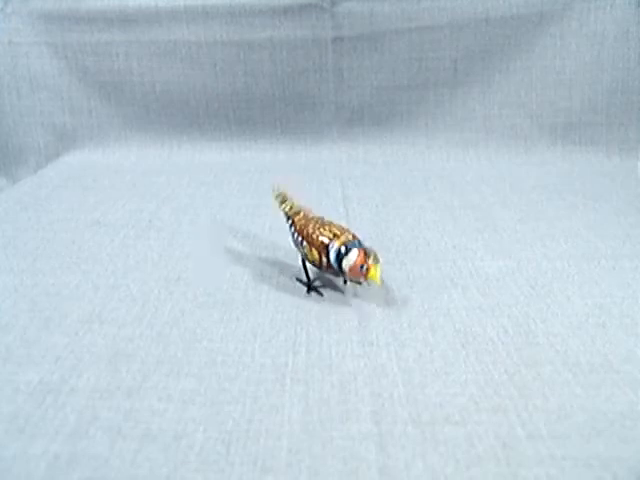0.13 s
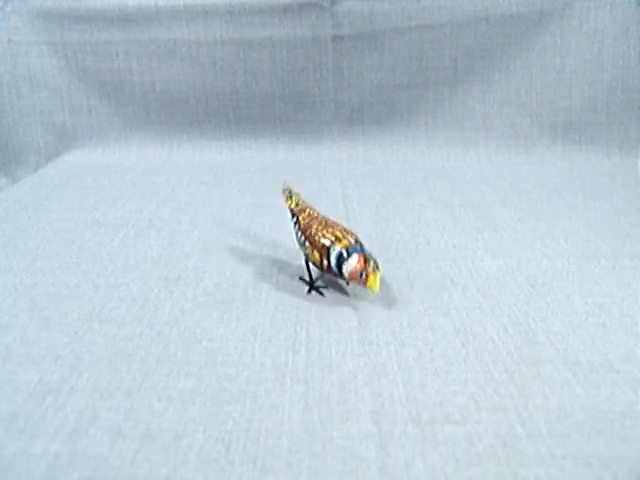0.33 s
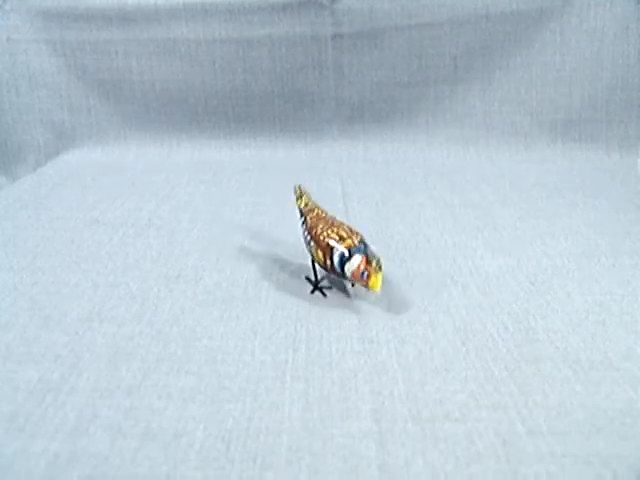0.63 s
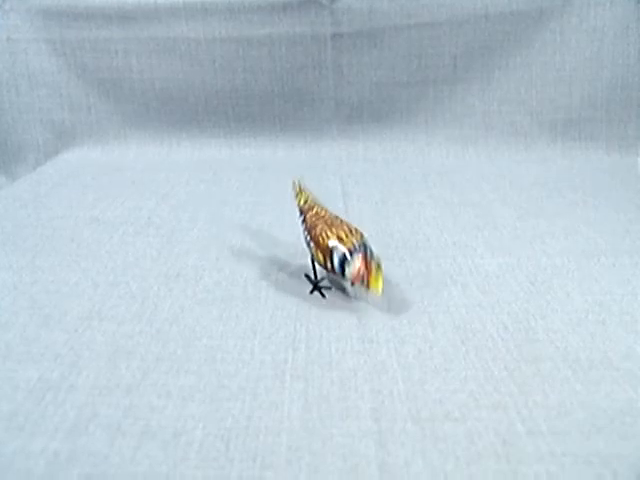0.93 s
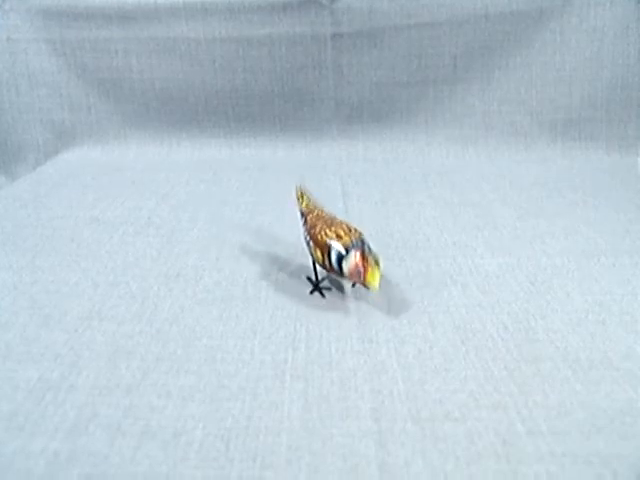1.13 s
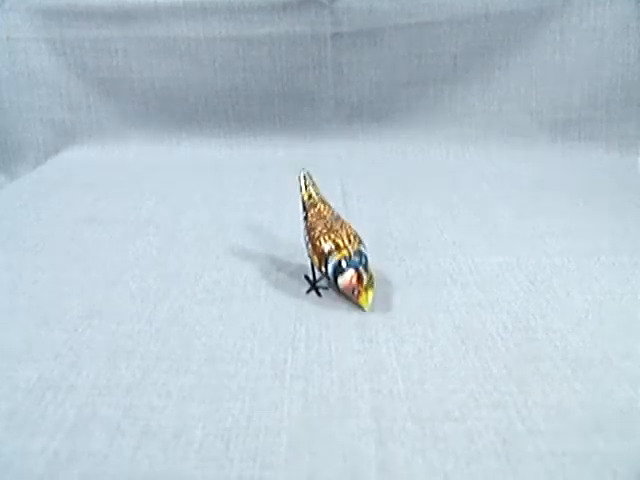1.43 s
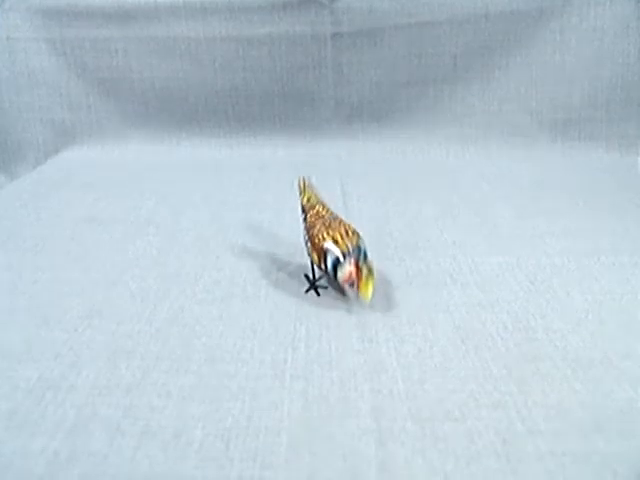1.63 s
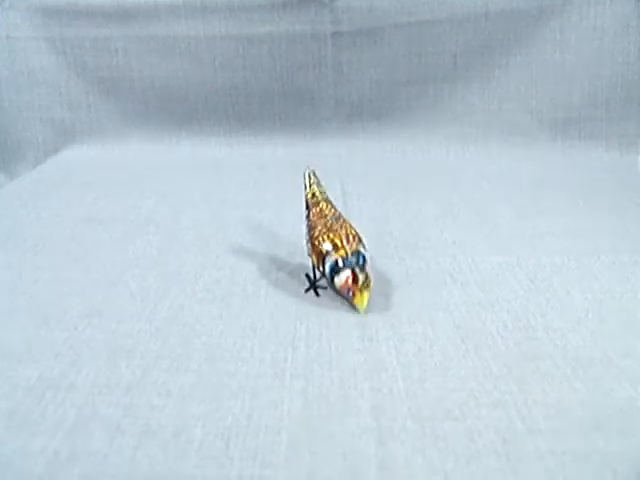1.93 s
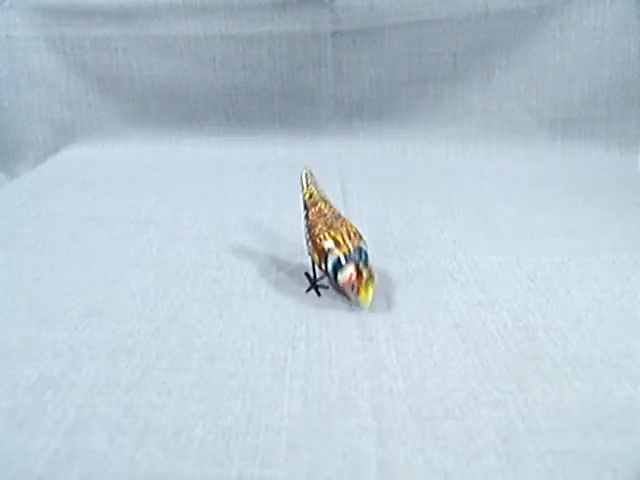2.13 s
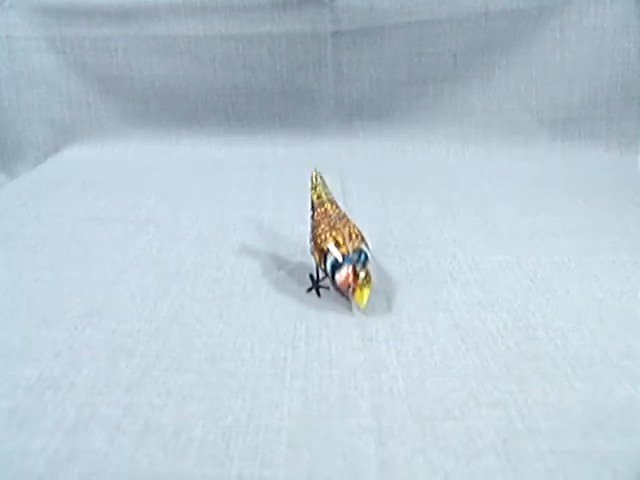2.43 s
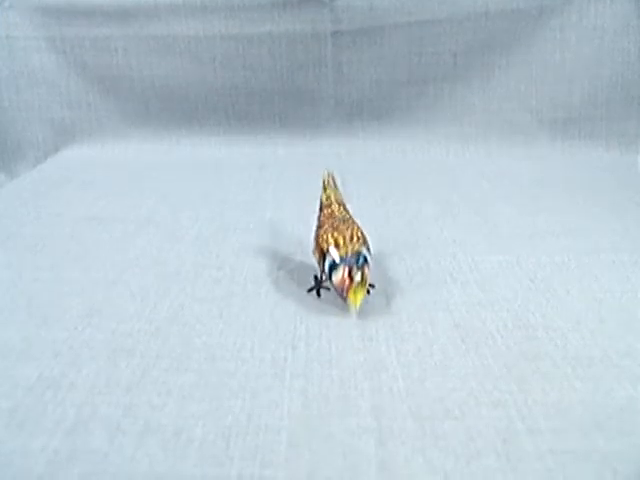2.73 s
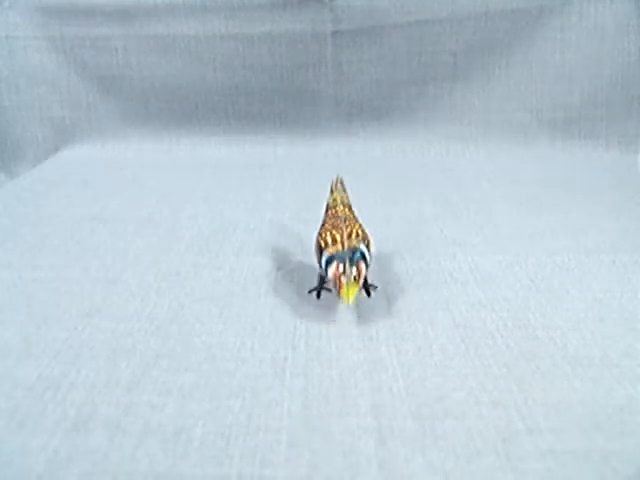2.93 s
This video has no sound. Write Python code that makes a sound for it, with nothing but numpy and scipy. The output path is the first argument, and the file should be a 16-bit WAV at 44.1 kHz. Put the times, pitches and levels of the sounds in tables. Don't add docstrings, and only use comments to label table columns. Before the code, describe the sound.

A clockwork tin bird rocks on a cloth-covered board, soft beak pecks alternating with sharper ringing metallic clacks, small rattles and dull foot thumps between, over faint gear whir; small room, close microphone.

```python
import sys
import numpy as np
from scipy import signal
from scipy.fft import rfft, irfft
from scipy.io import wavfile
from scipy.ndimage import uniform_filter1d, minimum_filter1d

SR = 44100
rng = np.random.default_rng(int(sys.argv[2]) if len(sys.argv) > 2 else 0)


def invert_db(x):
    u = np.asarray(x, float) / 20
    return 10 ** u


def to_wav(sig):
    pcm = np.clip(np.atleast_2d(sig), -1, 1) * 32767
    pcm = np.round(pcm).astype(np.int16)
    wavfile.write(sys.argv[1], SR, pcm.T)


N = 136710
T = np.arange(round(0.25 * SR)) / SR
BRIEF = T[:2000]


def read(points, hz):
    f, value = np.transpose(points)
    return np.interp(np.log(hz + 1), np.log(f + 1), value)


def evened(x):
    return x / np.sqrt(np.mean(x ** 2) + 1e-20)


def add(mix, s, sound):
    part = mix[round(s * SR):][:len(sound)]
    part += sound[:len(part)]


def coloured(points, size):
    z = rfft(rng.standard_normal(size))
    return evened(irfft(z * invert_db(read(points, np.fft.rfftfreq(size, 1 / SR))), size))


def modes(table, extra_db=0, t=T):
    hz, db, t60 = np.transpose(table)[:, :, None]
    level_luck, tuning_luck = rng.standard_normal((2, len(table), 1))
    wave = np.sin(2 * np.pi * hz * (1 + 0.0015 * tuning_luck) * t)
    drift = rng.standard_normal(wave.shape)
    for _ in range(2):
        drift = uniform_filter1d(drift, size=150)
    waver = 1 + 0.25 * evened(drift)
    decay = invert_db(db + extra_db + 1.2 * level_luck - 60 * t / t60)
    return (decay * wave * waver).sum(0)


SHELL_HZ = [1461, 2505, 2592, 3200, 3410, 3605, 3700, 4160, 4550, 5300, 6360, 7575, 7780, 8715]
# level_db, t60_s
SHELL = [(-29.5, 0.3), (-35.5, 0.064), (-11, 0.076), (-5.5, 0.079), (-22, 0.28), (-0.5, 0.055),
         (-26, 0.018), (-25.5, 0.33), (-20, 0.21), (-34, 0.36), (-23.5, 0.22), (-19, 0.11), (-15, 0.033),
         (-17.5, 0.078)]


def shell(low_db=0, t=T):
    table = np.column_stack([SHELL_HZ, SHELL])
    return modes(table, low_db * (table[:, :1] < 2800), t)


# freq_hz, level_db, t60_s
BOARD = [(129.1, -15, 0.39), (210, -34, 0.31), (278, -16.5, 0.19), (315.4, -7.5, 0.043), (463, -0.5, 0.032),
         (701, -17.5, 0.023), (914, -18.5, .02), (1119, -6.5, 0.036), (1530.5, -3, 0.044)]


def board():
    return modes(BOARD)


def crack(colour, decay_s=0.0077, rise_s=0.0003):
    shape = np.exp(-T / decay_s) * np.minimum(T / rise_s, 1) ** 2
    out = coloured(colour, len(T)) * shape
    return out * np.linalg.norm(shape) / np.linalg.norm(out)


def blows(rattle_db, delay=0.0):
    size, draw = rng.standard_normal(len(T)), rng.random(len(T))
    hits = draw < 900 / SR
    train = size * hits * np.exp(-T / 0.028) * (T > delay + 0.002)
    return invert_db(rattle_db - 6) * train / (np.linalg.norm(train) + 1e-9)


def struck(train, body):
    return signal.fftconvolve(train, body)[:len(T)]


# freq_hz, level_db
WHIR = [(24, -9.5), (55, 18.5), (320, 11.5), (926, -7), (3540, -1.5), (5000, 2.5), (7580, 0.5), (8310, 1),
        (10000, -2), (13000, -31), (22000, -120)]


def whir():
    flutter = evened(uniform_filter1d(rng.standard_normal(N), size=300))
    teeth = rng.standard_normal(N) * (rng.random(N) < 900 / SR)
    ring = evened(signal.fftconvolve(teeth, shell())[:N])
    return invert_db(-50.5) * invert_db(4 * flutter) * (coloured(WHIR, N) + invert_db(-20) * ring)


# freq_hz, level_db
PECK_CRACK = [(350, -19), (600, 1), (2580, 5.5), (3550, 0.5), (4990, 1), (5680, 5), (8580, 4.5),
              (10000, 2.5), (13000, -26), (22000, -120)]
# start_s, level_db, board_db, ring_db, rattle_db
PECKS = [(0.0797, -10.5, -23.5, -1, -19), (0.2376, -9.5, -24, -6.5, -13), (0.4324, -9, -22.5, -9.5, -11.5),
         (0.5731, -10.5, -21.5, -0.5, -13), (0.73, -10, -24.5, -3, -21), (0.9345, -11, -23.5, -3, -11),
         (1.1071, -9.5, -22, -3, -14.5), (1.285, -10, -22.5, -4, -12.5), (1.4886, -12.5, -37, -4.5, -7.5),
         (1.6586, -11, -24.5, 0, -32), (1.8101, -11.5, -26, -2, -18), (1.9705, -13.5, -26.5, 1, -23),
         (2.157, -12.5, -25.5, 0, -20), (2.3289, -10.5, -22, -8.5, -14.5),
         (2.4885, -11.5, -24.5, -4.5, -18), (2.638, -14, -26.5, -8.5, -8.5), (2.802, -13, -26.5, -3, -18),
         (2.9274, -11.5, -26, -2, -32), (3.0591, -15, -27.5, -4, -9.5)]


def peck(s, db, board_db, ring_db, rattle_db):
    jar = np.minimum(T / 0.0029, 1) ** 2
    tin = invert_db(ring_db - 7.5) * shell() * jar + invert_db(-7.5) * crack(PECK_CRACK, 0.0042, 0.0016)
    rattle = struck(blows(rattle_db + 16.5), tin * np.exp(-T / 0.0045))
    knock = invert_db(board_db - 1) * board() * np.minimum(T / 0.0011, 1)
    return s + 0.0004, invert_db(db) * (tin + rattle) + knock


# freq_hz, level_db
CLACK_CRACK = [(200, -21.5), (600, -10), (1100, -13.5), (1600, 5.5), (3200, -9.5), (4950, -4), (6200, 2),
               (10000, -2.5)]
# start_s, level_db, treble_db
REBOUNDS = [(0.1037, -31.5, -6.5), (0.1148, -47, -9), (0.1298, -41, -4), (0.1799, -26, -2),
            (0.1882, -23, -8.5), (0.2577, -26.5, -17), (0.2937, -50, -7), (0.3856, -37, -18),
            (0.392, -24, -21.5), (0.5148, -21.5, -7), (0.5471, -26, -46), (0.6662, -24, -11),
            (0.6847, -37, 3), (0.6907, -48, -23), (0.7005, -36, -10), (0.823, -38, -4.5),
            (0.8603, -14.5, -20.5), (0.882, -26, -15), (0.9129, -33, -55), (0.9636, -36, -8),
            (1.0286, -43, -11), (1.0394, -26.5, -9.5), (1.1301, -40, -4), (1.2199, -31, -28),
            (1.2352, -28, -14), (1.3613, -38, -12), (1.4305, -32, -14.5), (1.5046, -25, -8.5),
            (1.5681, -18, -25), (1.662, -20, -18), (1.6676, -17.5, -16), (1.7061, -49, -14),
            (1.7345, -20.5, -10.5), (1.8332, -25, -9.5), (1.8947, -12.5, -25.5), (1.9017, -25, -11),
            (1.9134, -35, -34), (2.0796, -11.5, -20.5), (2.0939, -31, -23), (2.1747, -21.5, -15),
            (2.1877, -41, -10), (2.1944, -33, -23), (2.251, -17, -14), (2.2593, -24.5, -19),
            (2.2684, -30, -31), (2.4397, -28, -11), (2.4464, -34, -10), (2.4591, -27, -33),
            (2.5872, -11.5, -37), (2.6016, -27, -11.5), (2.7829, -36, -38), (2.8173, -25, -16),
            (2.8286, -33.5, -3.5), (2.895, -18.5, -12.5), (2.9057, -29, -17), (2.9104, -40, -19),
            (2.9451, -32, -10), (3.0193, -15, -15)]


def rebound(s, db, treble_db):
    ring = shell(t=BRIEF) * np.exp(-BRIEF / 0.0067) * np.minimum(BRIEF / 0.0016, 1)
    tick = crack(CLACK_CRACK, 0.0032, 0.00024)[:len(BRIEF)]
    return s, invert_db(db - 6.5) * (ring + invert_db(treble_db + 18) * tick)


# freq_hz, level_db
THUD = [(60, -18.5), (150, -2), (600, -4), (1200, -29.5), (3000, -54.5)]
# start_s, level_db, pitch_hz, hollow_db
LANDINGS = [(0.187, -10, 230, -4.5), (0.346, -17.5, 285, -1), (0.521, -12, 314, -8),
            (0.948, -6.5, 260, -14), (1.386, -6.5, 508, -14.5), (1.496, 0, 343, -14.5),
            (1.663, -4, 326, -5.5), (1.822, -8, 260, -2.5), (1.989, -16.5, 231, -11.5),
            (2.177, -8, 317, -5.5), (2.738, -18.5, 316, -3), (3.016, -41, 473, 10)]
# start_s, level_db, pitch_hz, hollow_db
TICK = (.129, -15, 950, -35)


def landing(s, db, hz, hollow_db):
    patch = [(hz, 0, 0.035), (1.577 * hz, -1, 0.03), (130.5, hollow_db, 0.23)]
    thud = invert_db(-11.5) * (hz < 700) * crack(THUD, 0.0094, 0.0031)
    return s, invert_db(db - 18) * (modes(patch) + thud) * np.minimum(T / 0.0043, 1)


# start_s, level_db, low_ring_db, rattle_db, free_ringing_s
CLACKS = [(.168, -9.5, 2, -6, .03), (.3293, -4, 6, 8, 0.032), (.5039, -7.5, 5.5, 7, 0.044),
          (.6533, -4, 2.5, -5, 0.028), (.849, -7, 3, -9, 0.031), (1.0165, -6, -1, -7, 0.012),
          (1.1993, -7, 9, 4, 0.029), (1.3878, -8, 2.5, -7, 0.013), (1.558, -6.5, -.5, -6, 0.011),
          (1.7216, -7, -8, -0.5, 0.022), (1.8827, -7.5, -2.5, 0, 0.02), (2.0683, -9.5, 1, -1, 0.031),
          (2.2376, -6.5, -1, -8, 0.035), (2.4142, -7.5, 7, 3, 0.032), (2.5755, -7, 3.5, -10, 0.016),
          (2.721, -7, 3.5, -14, 0.037), (2.8784, -6, 4, -6, 0.019), (3.0046, -8, -7, -5, 0.056)]


def clack(s, db, low_db, rattle_db, free_s):
    ring_db, second_s = -7.5, 0.0042
    held = np.exp(-T / 0.0045)
    train = blows(min(rattle_db + 3.5, 5), second_s)
    rest = invert_db(-10 / (1 + np.exp(np.clip((free_s - T) / 0.00017, -50, 50))))
    onset = np.minimum(T / 0.00062, 1) * (1 + 0.47 * np.exp(-T / 0.0014))
    blow = invert_db(ring_db) * shell(low_db) * onset + invert_db(-15) * crack(CLACK_CRACK)
    touch = invert_db(ring_db - 21) * shell() * held + invert_db(-8) * crack(CLACK_CRACK, 0.0039, 0.0018)
    rattle = struck(train, blow * held)
    push = invert_db(-33.5) * np.sin(2 * np.pi * 64 * T) * np.exp(-T / 0.024)
    delayed = np.pad(blow, (round(second_s * SR), 0))[:len(T)]
    tin = touch + (delayed + rattle) * rest
    return s - second_s - 0.001, invert_db(db) * (tin + invert_db(-28.5) * board() + push)


# freq_hz, t60_s
ROOM = [(200, 0.13), (1000, 0.39), (4000, 0.17), (10000, 0.13)]


def room(x):
    size = SR // 3
    taps = rng.standard_normal(size) * (np.arange(size) > 90)
    hz, t, z = signal.stft(taps, SR, nperseg=256)
    decay = invert_db(-60 * t / read(ROOM, hz)[:, None])
    tail = rfft(signal.istft(z * decay, SR, nperseg=256)[1])
    tail = irfft(tail / np.sqrt(abs(tail) + 1e-9))
    tail = tail[:SR // 4] * np.hanning(SR // 2)[SR // 4:]
    return signal.fftconvolve(x, tail / np.linalg.norm(tail))[:N]


def scene():
    toy = np.zeros((3, N))
    feet = list(LANDINGS) + [TICK]
    for table, source in ((PECKS, peck), (REBOUNDS, rebound), (feet, landing), (CLACKS, clack)):
        for k, row in enumerate(table):
            add(toy[k % 3], *source(*row))
    wet = sum(part + invert_db(-11.5) * room(part) for part in toy)
    opening = np.clip((np.arange(N) / SR - 0.0744) / 0.0022, 0, 1)
    return ((wet + whir()) * opening)[None]


# start_s, length_s, lowest_lost_hz
DROPOUTS = [(0.218, 0.0058, 4900), (0.288, 0.036, 2080), (0.396, 0.029, 3800), (0.467, 0.03, 2170),
            (0.549, 0.019, 4820), (0.611, 0.039, 2000), (0.905, 0.026, 3180), (0.969, 0.043, 2870),
            (1.085, 0.022, 3220), (1.156, 0.021, 4200), (1.27, 0.017, 3900), (1.515, 0.035, 4500),
            (1.621, 0.037, 1140), (1.692, 0.024, 5100), (1.825, 0.049, 4160), (1.954, 0.015, 3650),
            (2.133, 0.02, 1890), (2.202, 0.032, 1660), (2.307, 0.019, 4400), (2.376, 0.029, 1820),
            (2.455, 0.027, 3850), (2.774, 0.028, 3670), (2.831, 0.042, 3640), (3.031, 0.023, 4340)]


def starved(x):
    frame = dict(fs=SR, window=np.sin(np.pi * (np.arange(512) + 0.5) / 512), nperseg=512, noverlap=256)
    lead = 51
    hz, t, z = signal.stft(np.pad(x, (lead, 0)), **frame)
    t, hz = t - lead / SR, hz[:, None]

    power = uniform_filter1d(abs(z) ** 2, size=9, axis=0)[4::8]
    band_db = 10 * np.log10(abs(power) + 1e-20).repeat(8, 0)
    band_db = np.vstack([band_db, band_db[-1:]])
    loud_db = -minimum_filter1d(-band_db.max(0), size=7)
    limit_db = loud_db - 31 + 11 * np.log2(hz / 4000 + 0.11)

    fine = rng.standard_normal((33, len(t)))
    coarse = rng.standard_normal((17, len(t) // 2 + 1)).repeat(2, 0).repeat(2, 1)
    luck = (fine + coarse[:33, :len(t)]).repeat(8, 0)[:len(hz)]
    limit_db = limit_db + 7 * luck * np.clip(hz / 6000, 0, 1)
    keep = 1 / (1 + invert_db(np.clip(4 * (limit_db - band_db), -100, 100)))

    edge = np.full(len(t), SR / 2)
    for start, length, low_hz in DROPOUTS:
        u = (t - start) / length
        sink = 7500 + (low_hz - 7500) * np.clip(u / 0.36, 0, 1)
        edge = np.where((u > 0) & (u < 1), sink, edge)
    above = (hz - edge * (1 + 0.3 * luck)) / 40
    keep = keep / (1 + np.exp(np.clip(above, -50, 50)))
    return signal.istft(z * keep, **frame)[1][lead:lead + N]


def top_cut(x):
    return signal.sosfilt(signal.butter(12, 11160, fs=SR, output="sos"), x)


def record(dry):
    bass_cut = signal.butter(3, 84, "high", fs=SR, output="sos")
    x = signal.sosfilt(bass_cut, dry[0]) + invert_db(-6.5) * dry[0]
    x = 0.9 * np.tanh(x / 0.9)
    band_limit = signal.firwin(511, 10060, window=("kaiser", 9), fs=SR)
    x = signal.oaconvolve(starved(x), band_limit, "same")
    return top_cut(x[None])


dry = scene()
out = record(dry)
to_wav(out)
```